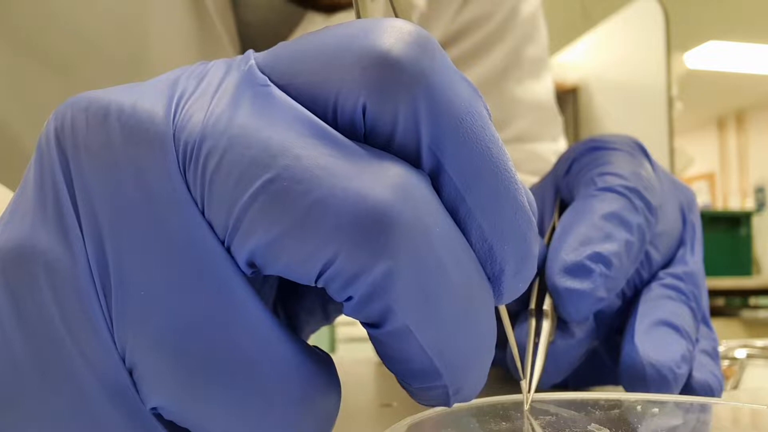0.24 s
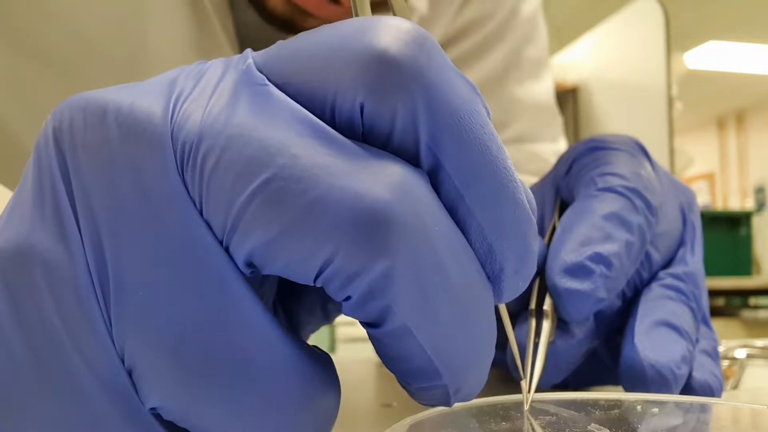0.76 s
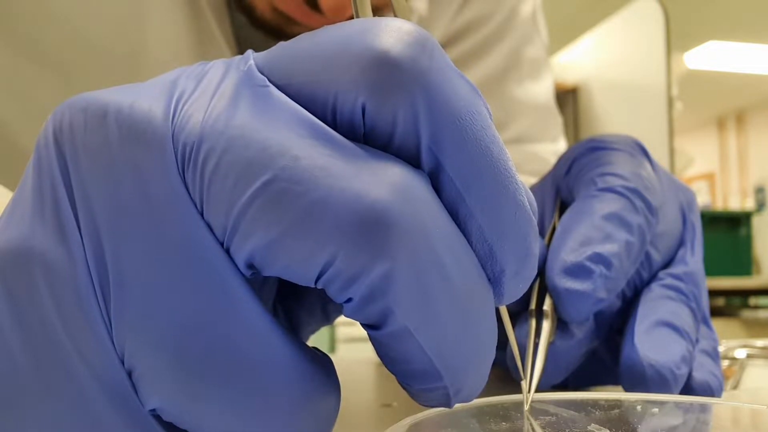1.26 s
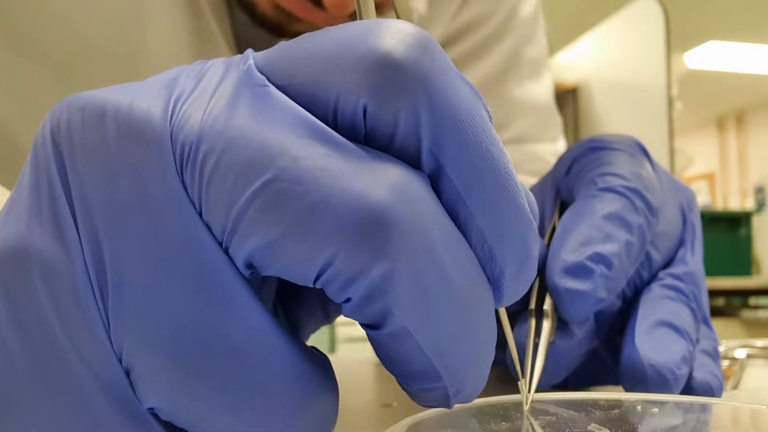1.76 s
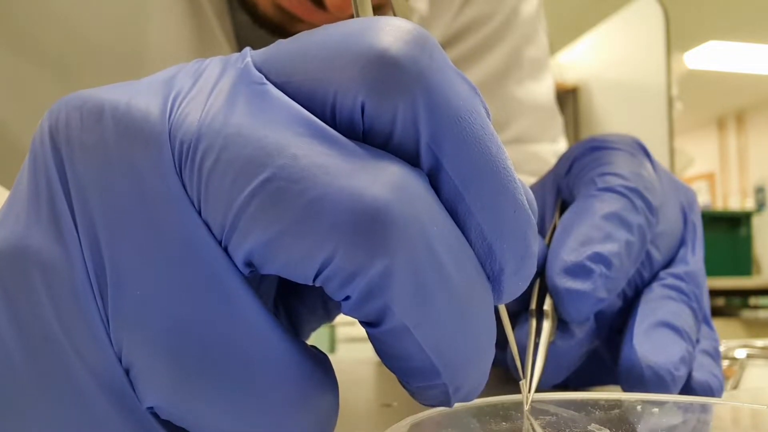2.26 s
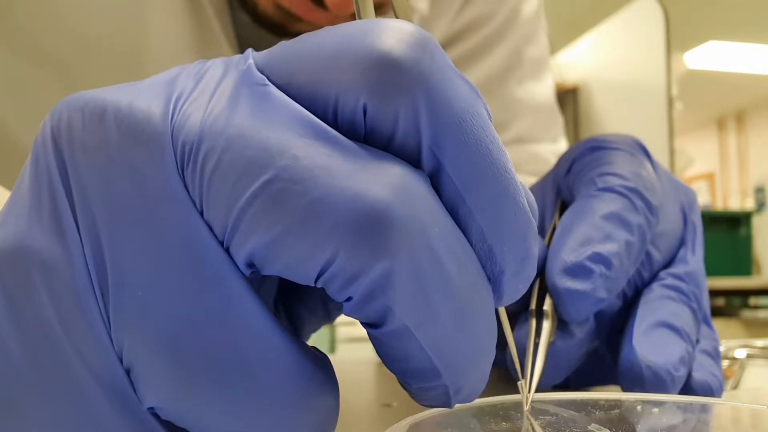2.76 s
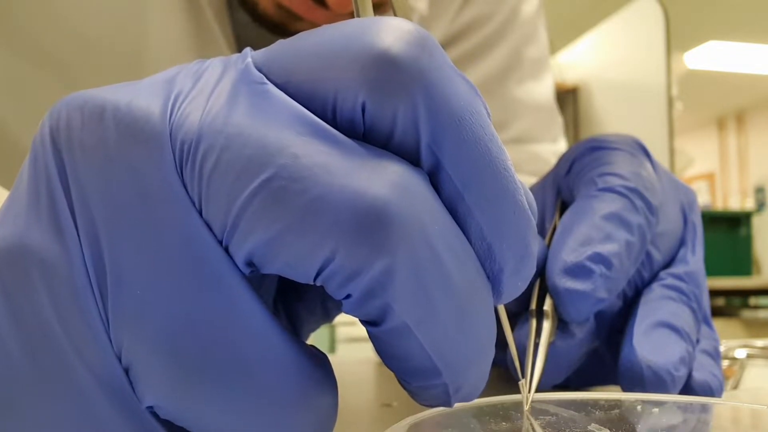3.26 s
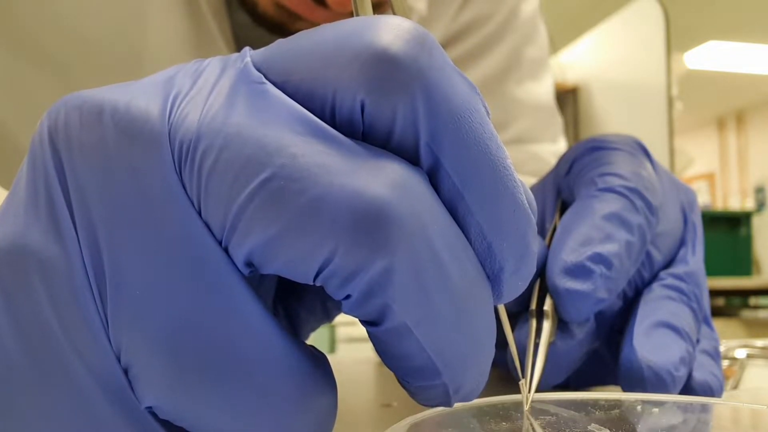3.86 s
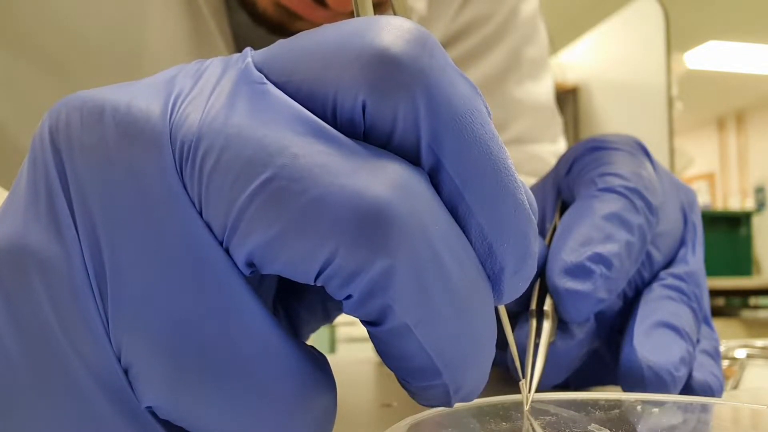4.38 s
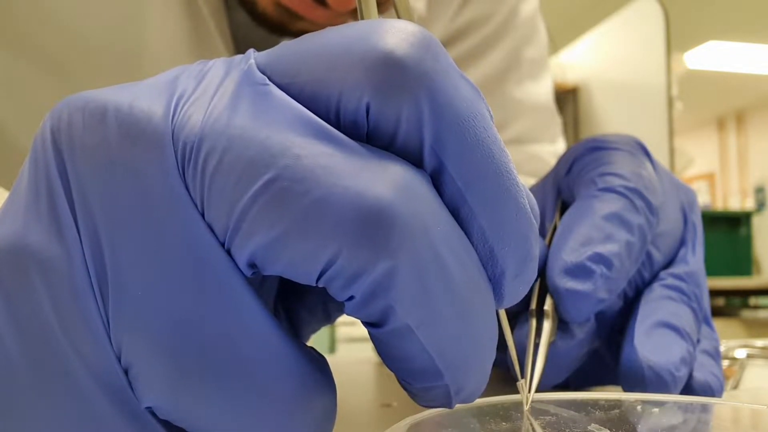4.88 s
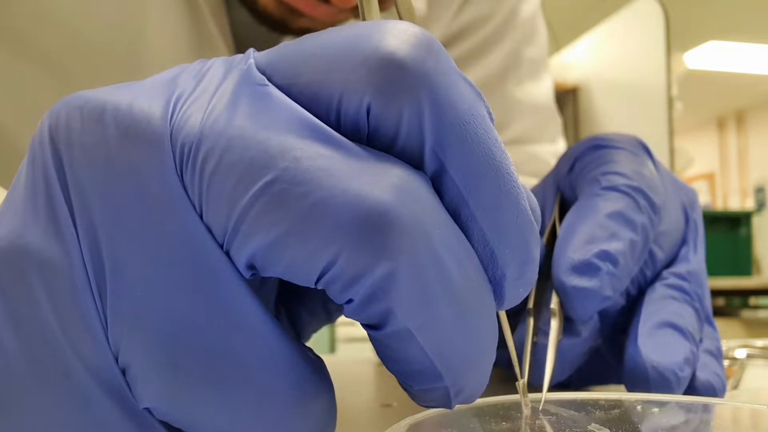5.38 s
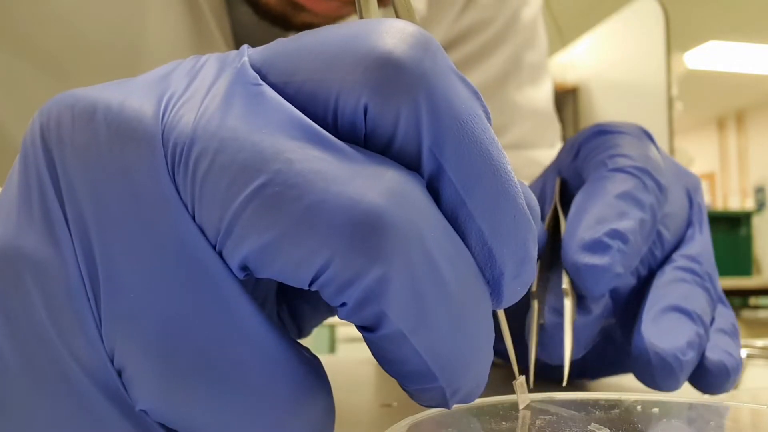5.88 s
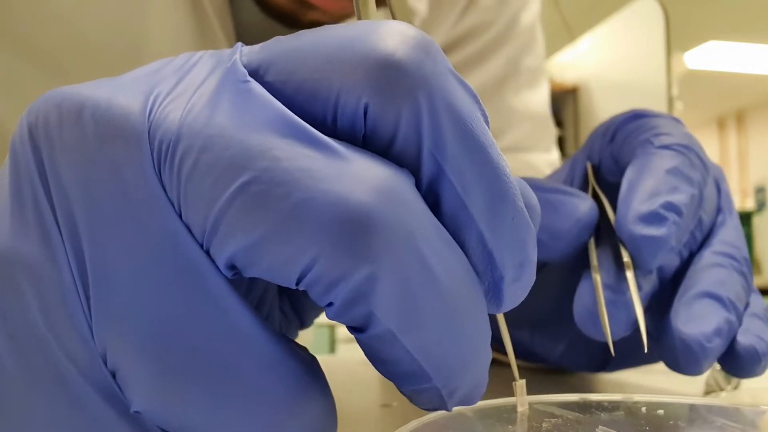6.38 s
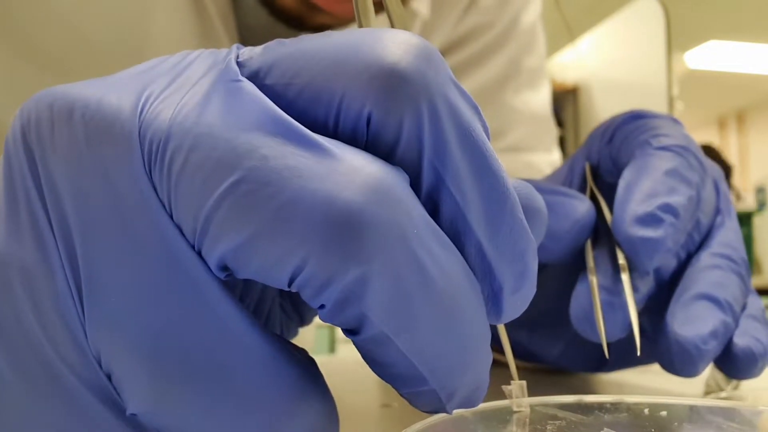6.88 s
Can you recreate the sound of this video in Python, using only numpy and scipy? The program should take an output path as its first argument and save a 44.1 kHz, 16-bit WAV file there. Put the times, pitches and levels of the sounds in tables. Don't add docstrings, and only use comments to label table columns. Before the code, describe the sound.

Fine steel tweezers scratch and tick brightly on a small glass dish over a low lab fan hum, before a soft distant cupboard thud.

```python
import sys
import numpy as np
from scipy import signal
from scipy.fft import rfft, irfft
from scipy.io import wavfile
from scipy.ndimage import uniform_filter1d

SR = 44100
rng = np.random.default_rng(int(sys.argv[2]) if len(sys.argv) > 2 else 0)


def boost_factor(decibels):
    exponent = np.asarray(decibels, float) / 20
    return 10 ** exponent


def wrap_up_sound(samples):
    columns = np.atleast_2d(samples).T
    tamed = np.clip(columns, -1, 1)
    steps = np.round(tamed * 32767).astype(np.int16)
    wavfile.write(sys.argv[1], SR, steps)


N = 314874


def evened(x):
    return x / np.sqrt(np.mean(x ** 2) + 1e-20)


def read(points, hz):
    f, value = np.transpose(points)
    return np.interp(np.log(hz + 1), np.log(f + 1), value)


def add(mix, s, sound):
    part = mix[..., round(s * SR):][..., :sound.shape[-1]]
    part += sound[..., :part.shape[-1]]


def bumps(peaks, hz):
    return 1 + sum(boost_factor(2 * db) / (1 + (2 * (hz - f) / width) ** 2) for f, width, db in peaks)


# f/Hz, likeness (1 = the same)
LIKENESS = [(25, .93), (60, 1), (130, 0.97), (290, 0.84), (640, 0.46), (1200, -0.26), (2200, -0.15),
            (3500, 0.41)]


def diffuse(gain):
    a, b, c, d = rng.standard_normal((*gain.shape[::-1], 4)).T
    size = 2 * len(gain) - 2
    same = np.clip(read(LIKENESS, np.fft.rfftfreq(size, 1 / SR)), -1, 1)[:, None]
    left = a + 1j * b
    right = same * left + np.sqrt(1 - same ** 2) * (c + 1j * d)
    return signal.istft(gain * np.array([left, right]), nperseg=size, noverlap=size * 3 // 4)[1]


# f/Hz, level/dB
AIR = [(15, -38), (28, -20), (45, -11), (64, -10), (100, -4.5), (128, -16.5), (230, -16), (450, -22.5),
       (620, -27), (1020, -32), (1700, -37.5), (2700, -42.3), (7500, -56), (15500, -49)]
# f/Hz, width/Hz, level/dB
DUCTS = [(92.2, 18.5, 6), (78, 7.7, 1.5), (142.3, 8.8, 9), (270, 1.2, -5), (312, 7.3, -3.5),
         (427, 6.3, 6.5), (545, 46, 4.5), (677.6, 20, 5), (751, 13, 2), (780, 5, -16.5), (897, 3.2, 14.5),
         (1466, 8.5, 4.5)]
# t/s, level/dB
MOTOR_BEAT = [(0, -60), (.45, -51.5), (.95, -66), (1.8, -55), (2.4, -65.5), (3.0, -61), (3.35, -72),
              (3.85, -57.5), (4.35, -65), (5.0, -58.5), (6.1, -52), (6.6, -65), (7.14, -59)]


def hum():
    hz, frames = np.fft.rfftfreq(8192, 1 / SR), N // 2048 + 5
    patches = evened(uniform_filter1d(rng.standard_normal((len(hz), frames)), size=60, axis=0))
    colour = boost_factor(read(AIR, hz)) * np.sqrt(bumps(DUCTS, hz))
    air = diffuse(colour[:, None] * boost_factor(0.32 * patches))[:, :N]
    waver = uniform_filter1d(rng.standard_normal(N), size=9000)
    waver = evened(uniform_filter1d(waver, size=9000))
    t = np.arange(N) / SR
    motor_hz = 49.2 + 0.27 * waver[::-1]
    motor = boost_factor(np.interp(t, *np.transpose(MOTOR_BEAT))) * np.sin(2 * np.pi * np.cumsum(motor_hz) / SR)
    buzz = boost_factor(-56 + 2.2 * waver) * np.sin(2 * np.pi * 100 * t)
    return (boost_factor(-48.5) * evened(air) + np.sqrt(2) * (motor + buzz)) * boost_factor([[-.45], [.45]])


def ports(x):
    late_s, weaker_db = 0.00022, 6
    return np.array([x[0], boost_factor(-weaker_db) * np.roll(x[-1], round(late_s * SR))])


FAMILY_BORDERS = [3550, 4700, 6550, 8100]
# f/Hz, level/dB per dB of peak
WAKING = [(1735, .3), (2620, .3), (3050, -.1), (3335, .4), (3720, .4), (3975, -.2), (4055, -.2), (4405, .1),
          (4500, -.05), (4878, .35), (5230, .4), (5655, -.05), (6097, .35), (6300, 0), (6650, .4),
          (7170, -.3), (7290, .2), (7348, .2), (7680, -.1), (9000, 0)]


def rasp(rows, modes, grit, grit_db, treble_db, place_db, fade_s, damp_s, bloom_s, swarm, swarm_db, swarm_s, spots):
    out = np.zeros((2, N))
    hz, width, db = np.transpose(modes)[:, :, None]
    mode_hz = hz[:, 0]
    family = np.searchsorted(FAMILY_BORDERS, mode_hz)
    t, bins = np.arange(4096) / SR, np.fft.rfftfreq(256, 1 / SR)
    window = np.hanning(256)

    dying = np.exp(-np.pi * width * t - (t / damp_s) ** 2)
    dying *= 1 - np.exp(-(t / bloom_s) ** 2)
    near = dying * np.sin(2 * np.pi * hz * t)
    far = dying * np.sin(2 * np.pi * hz * t + rng.normal(0, 1.0, hz.shape))
    pickup = abs(rfft(near)) ** 2
    waking = np.clip(read(WAKING, mode_hz), -.5, .5)

    place = rng.standard_normal((len(rows), len(modes)))
    swarms = rng.standard_normal((len(rows), 2, 1024)) * np.exp(-t[:1024] / swarm_s)
    tint = np.roll(irfft(boost_factor(read(swarm, bins))), 128) * window
    dry = np.roll(irfft(boost_factor(read(grit, bins))), 128) * window
    slips = rng.standard_normal((len(rows), 4096))
    slips *= boost_factor(6.1 * np.minimum(rng.exponential(1, (len(rows), 4096)), 3))

    for (s, peak_db, contact_s, low, middle, high), spot, slip, crowd in zip(rows, place, slips, swarms):
        rise_s = 0.6 * contact_s
        press = np.sin(np.pi / 2 * np.clip(t / rise_s, 0, 1)) ** 2
        release = np.exp(-np.maximum(t - contact_s, 0) / fade_s - 0.065 * t / contact_s)
        force = slip * press * release

        harder_db = 0.3 * (peak_db + 51.5)
        share = boost_factor(db[:, 0] + place_db * spot + waking * (peak_db + 39.0))
        share /= np.sqrt(np.bincount(family, share ** 2))[family]
        share *= boost_factor(np.array([low, middle, 0, high, treble_db + harder_db]))[family]
        for from_s, to_s, spot_hz, spot_db in spots:
            if from_s < s <= to_s:
                share *= boost_factor(spot_db * np.exp(-((mode_hz - spot_hz) / 85) ** 6))
        weight = share / np.sqrt(pickup @ abs(rfft(force)) ** 2)

        body = np.array([weight @ near, weight @ far])
        body /= np.linalg.norm(body[0])
        body[:, :256] += boost_factor(grit_db + harder_db) * dry / np.linalg.norm(dry)
        crowd = signal.fftconvolve(crowd[:1] + .5 * crowd, tint[None], "same", axes=1)
        body[:, :1024] += boost_factor(swarm_db) * crowd / np.linalg.norm(crowd[0])

        sound = signal.fftconvolve(force[None], body, axes=1)
        loudest = np.sqrt(uniform_filter1d(sound[0] ** 2, size=180).max())
        add(out, s - .5 * rise_s - .5 * bloom_s, boost_factor(peak_db - 3.5) * sound / loudest)
    return ports(out)


# t/s, peak level/dB, contact/s, low modes/dB, high modes/dB (against central ones)
TAPS = [(0.167, -52, 0.018, 4, 19), (0.184, -50.5, 0.021, 2.5, 13.5), (0.209, -55.5, 0.012, -2, 17),
        (1.463, -33.5, 0.007, -12, -7), (1.469, -30, 0.008, -9.5, -3), (1.484, -41, 0.016, 3, -4),
        (1.498, -45.5, 0.01, -11, 0), (1.511, -40.5, 0.007, -2.5, 3.5), (1.922, -50.5, 0.028, -1, 14.5),
        (1.957, -50.5, 0.0088, -5, 10), (2.826, -40.5, 0.025, -5.5, -8), (2.844, -47.5, 0.015, 16, -6),
        (2.977, -46, 0.018, 2.5, 9.5), (2.995, -48, 0.009, 2, 9), (3.394, -53, 0.021, 0, 7),
        (4.622, -43, 0.013, 2, 2.5), (4.659, -46, 0.029, -10, -4), (4.682, -47.5, 0.011, -7, 2),
        (5.013, -48.5, 0.0074, -16, 2), (5.089, -45.5, 0.038, -15, -3), (5.114, -36, 0.017, -10.5, -6),
        (5.139, -41.5, 0.026, -7.5, -7.5), (5.163, -49, 0.014, -3, 5), (5.199, -49.5, 0.005, -7, 7)]
# t/s, peak level/dB
GRAZES = [(0.065, -76), (0.125, -62), (0.25, -88), (0.33, -75), (0.82, -68.5), (1.39, -75), (1.54, -82),
          (1.69, -84), (1.858, -69), (1.89, -62.5), (2.626, -62.5), (2.793, -56), (3.077, -68),
          (3.201, -70), (3.28, -67), (3.42, -71), (4.169, -69), (4.606, -65.5), (4.88, -70), (5.374, -63.5),
          (6.128, -65.5)]
# first slip t/s, last slip t/s, first level/dB, last level/dB, high modes/dB
DRAGS = [(0.373, 0.42, -64, -87, 13), (1.746, 1.809, -63.5, -66.5, 3), (2.02, 2.03, -63, -67, 11),
         (2.111, 2.152, -64, -62.5, 1), (2.866, 2.915, -57.5, -74, -1), (3.223, 3.249, -60, -55.5, 1),
         (3.327, 3.346, -54, -62, -7), (4.71, 4.756, -57, -67.5, 1), (4.936, 4.981, -63, -54.5, -1),
         (5.022, 5.058, -50.5, -48.5, -3), (5.211, 5.233, -51, -60.5, -2)]


def dish_contacts():
    light = (0.022, -9, -2)  # contact/s, low/dB, middle/dB of a light slip or graze
    rows = []
    for s, db, contact_s, low, high in TAPS:
        rows.append((s, db, contact_s, low, 1 + 0.29 * low, high))
    for s, db in GRAZES:
        rows.append((s, db, *light, -3.5))
    for first_s, last_s, first_db, last_db, high in DRAGS:
        slips = 1 + round((last_s - first_s) / .024)
        for s, db in np.linspace((first_s, first_db), (last_s, last_db), slips):
            rows.append((s, db, *light, high))
    return rows


# f/Hz, width/Hz, level/dB within the family
DISH_MODES = [(1735, 36, -6), (2207, 36, -11), (2620, 55, -12), (3050, 45, 0), (3335, 60, -9),
              (3720, 50, -3), (3975, 40, -1), (4055, 40, -2), (4405, 45, -4), (4500, 50, -7), (4878, 40, 0),
              (4960, 40, -11), (5230, 60, -13), (5655, 40, -8), (6097, 40, 1), (6190, 40, -9),
              (6300, 45, -3), (6650, 80, -11), (7170, 45, -4), (7290, 40, -7), (7348, 40, -1),
              (7680, 45, -6), (8690, 55, -7), (9500, 70, -7), (10520, 70, 0), (11650, 90, -5),
              (12900, 800, -7), (15000, 600, -2)]
# f/Hz, level/dB
DISH_GRIT = [(500, -24.5), (1500, -18.5), (2500, -14), (4000, -15), (6000, -1.5), (8000, -19.5),
             (10500, -15.5), (12000, -2), (15400, 10.5), (16500, -17)]
# f/Hz, level/dB
DISH_SWARM = [(600, -19), (1200, -4), (2500, -5), (4000, -11), (5500, -4.5), (7000, 2), (8000, -9),
              (10000, -22), (16000, -28.5)]
# from t/s, to t/s, mode f/Hz, level/dB
DISH_SPOTS = [(0.106, 0.226, 7400, -13), (0.106, 0.226, 7680, -10.5), (0.356, 0.436, 2620, -7),
              (0.356, 0.436, 7680, -12), (1.448, 1.479, 3720, -4), (1.448, 1.479, 7170, -12),
              (1.448, 1.479, 7280, -5), (1.479, 1.531, 3050, -14), (1.479, 1.531, 4000, -8),
              (1.479, 1.531, 7230, -12), (1.479, 1.531, 7680, -11), (1.736, 1.836, 2620, 6),
              (1.736, 1.836, 6300, -10), (1.736, 1.836, 7200, -5.5), (1.906, 1.981, 7330, -15),
              (1.906, 1.981, 7680, -7), (1.996, 2.056, 2207, -5), (1.996, 2.056, 7170, -6),
              (1.996, 2.056, 7680, -11), (2.096, 2.186, 3720, 8), (2.096, 2.186, 6300, -4),
              (2.096, 2.186, 7680, -6), (2.776, 2.811, 4900, -3), (2.776, 2.811, 5230, 7),
              (2.776, 2.811, 5655, -10), (2.776, 2.811, 6100, -11), (2.776, 2.811, 7170, -14),
              (2.776, 2.811, 7680, -8), (2.811, 2.866, 3720, -7), (2.811, 2.866, 5655, 7.5),
              (2.811, 2.866, 6100, -5), (2.811, 2.866, 8690, 9), (2.866, 2.926, 6300, -7),
              (2.811, 2.866, 3050, -0.5),
              (2.966, 3.026, 6140, -5), (2.966, 3.026, 7300, -19), (2.966, 3.026, 7680, -9),
              (3.206, 3.296, 5655, -6), (3.206, 3.296, 6140, -9), (3.206, 3.296, 3990, 4),
              (3.206, 3.296, 7170, -9), (3.206, 3.296, 7680, -11), (3.206, 3.376, 4900, -6),
              (3.316, 3.376, 4400, 6), (3.316, 3.376, 6300, -7), (3.381, 3.436, 3050, -12),
              (3.381, 3.436, 4020, 8.5), (3.381, 3.436, 4450, -10), (3.381, 3.436, 4900, -8),
              (3.381, 3.436, 6300, -11), (3.381, 3.436, 7400, -12), (3.381, 3.436, 7680, -9),
              (4.611, 4.646, 2207, 6), (4.611, 4.646, 3050, -12), (4.611, 4.646, 3335, -11),
              (4.611, 4.646, 3720, 2), (4.611, 4.646, 4870, -17), (4.611, 4.648, 5655, 4),
              (4.611, 4.646, 6270, -14), (4.611, 4.646, 6650, -14), (4.611, 4.646, 7270, -10),
              (4.611, 4.646, 7330, -1), (4.611, 4.646, 7680, -12), (4.648, 4.756, 4015, -3),
              (4.648, 4.753, 4420, 1), (4.648, 4.756, 4900, -15), (4.648, 4.756, 5230, 1),
              (4.648, 4.75, 5655, -6), (4.648, 4.752, 7180, -10), (4.648, 4.758, 7680, -10),
              (4.926, 5.081, 7300, -4), (5.101, 5.133, 4500, 4), (5.101, 5.133, 6300, -6),
              (5.101, 5.133, 7300, -11), (5.133, 5.186, 2620, 7), (5.133, 5.186, 6650, -9),
              (5.133, 5.186, 7080, -11), (5.186, 5.256, 6300, -10), (5.186, 5.256, 7170, -7),
              (5.186, 5.256, 7680, -4)]
# from t/s, to t/s, mode
# f/Hz, level/dB
MORE_SPOTS = [(.106, .15, 4015, 9.5), (1.448, 1.479, 4015, 4), (2.966, 3.026, 10520, -2),
              (1.448, 1.479, 6097, 5), (1.448, 1.479, 3050, -1), (1.906, 1.94, 3050, 4.5),
              (1.906, 1.981, 4015, 2), (2.811, 2.866, 4450, 3), (2.966, 3.026, 4015, 1),
              (2.966, 3.026, 4450, -11), (2.966, 3.026, 4900, -7), (3.235, 3.296, 3050, 8.5),
              (3.381, 3.436, 5655, 6), (5.006, 5.02, 6097, 10), (5.101, 5.133, 5655, 7),
              (5.08, 5.186, 8690, -17), (5.08, 5.186, 9500, -12), (5.205, 5.256, 4015, 5),
              (6.301, 6.341, 7560, -12), (6.301, 6.341, 6830, 9), (6.342, 6.368, 4080, -6),
              (6.342, 6.446, 2530, 1.5)]


def dish():
    return rasp(dish_contacts(), DISH_MODES, DISH_GRIT, grit_db=-17.0, treble_db=-7.0, place_db=1.0,
                fade_s=.004, damp_s=.045, bloom_s=.0035, swarm=DISH_SWARM, swarm_db=-15.0, swarm_s=.009,
                spots=DISH_SPOTS + MORE_SPOTS)


# f/Hz, time to fall 60 dB/s
LAB_RING = [(80, 0.99), (300, 0.36), (1000, 0.62), (3000, 0.46), (8000, 0.34), (15000, 0.1)]


def lab_tail(gain, frames, size):
    hz, t = np.fft.rfftfreq(size, 1 / SR), np.arange(frames) * size / 4 / SR
    return diffuse(gain(hz)[:, None] * boost_factor(-60 * t / read(LAB_RING, hz)[:, None]))


def lab_echo(tools):
    echo = lab_tail(lambda hz: 1 / (1 + (hz / 6000) ** 4), frames=300, size=256)
    echo /= np.linalg.norm(echo[0])
    return boost_factor(-26.5) * signal.fftconvolve(tools[:1], echo, axes=1)[:, :N]


# t/s, f/Hz, level/dB, time to fall 60 dB/s
THUMPS = [(1.47, 840, -54.5, 0.16), (2.831, 1096, -58, 0.093), (4.625, 545, -33.5, 0.037),
          (4.664, 530, -47.5, 0.15), (5.121, 547, -51.5, 0.15), (6.39, 487, -47, 0.065),
          (6.527, 492, -43.5, 0.088), (6.635, 1620, -60, 0.071), (6.695, 96.4, -27, 0.18),
          (6.83, 817, -33, 0.04), (6.857, 270, -44, 0.27), (6.921, 368, -53, 0.099)]


def low_thumps():
    out, t = np.zeros(N), np.arange(8000) / SR
    for s, hz, db, t60 in THUMPS:
        add(out, s, boost_factor(db - 60 * t / t60) * np.clip(t / 0.01, 0, 1) * np.sin(2 * np.pi * hz * t))
    return out * boost_factor([[1.5], [-1.5]])


# t/s, peak level/dB, dying/s, brightness/(dB per kHz)
SNAPS = [
    (1.473, -61, 0.002, -1),
    (1.4855, -56, 0.002, 0.5),
    (2.847, -69, 0.0025, -0.5),
    (4.626, -67, 0.0018, -4),
    (5.0147, -60, 0.0049, -1),
    (5.046, -68.5, 0.0047, -1),
    (5.198, -57, 0.0026, -2),
    (6.354, -46.5, 0.0018, -1.5),
    (6.658, -60, 0.0012, -3),
]


def snaps():
    out, t, hz = np.zeros((2, N)), np.arange(2048) / SR, np.fft.rfftfreq(2048, 1 / SR)
    slope = [(800, -22), (2500, -21), (5000, -6.5), (15400, 14.0), (16500, -17)]  # f/Hz, level/dB
    for (s, db, dying_s, bright), crackle in zip(SNAPS, rng.standard_normal((len(SNAPS), 2, 2048))):
        crackle = crackle[:1] + .5 * crackle
        crackle = irfft(rfft(crackle) * boost_factor(read(slope, hz) + bright * (hz / 1000 - 11)))
        add(out, s, boost_factor(db + 13.0) * crackle * np.clip(t / 0.0012, 0, 1) * np.exp(-t / dying_s))
    return ports(out)


# t/s, peak level/dB, contact/s, middle modes/dB, high modes/dB (against central ones)
SCUFFS = [(6.278, -59.5, 0.025, -8, 8), (6.317, -43.5, 0.0072, -14, 23), (6.353, -40.5, 0.005, -12, 5.5),
          (6.364, -49, 0.011, -6, -2), (6.376, -53, 0.012, 11, -1), (6.394, -45.5, 0.015, 12, 12),
          (6.407, -54, 0.016, 0, 9), (6.428, -60, 0.015, 0, 6), (6.511, -53, 0.018, -3, 5),
          (6.532, -45.5, 0.022, 1, 4), (6.554, -48, 0.014, 6, 8), (6.596, -52, 0.013, -3, 10),
          (6.657, -40.5, 0.011, -13, 11), (6.912, -51, 0.0096, -7, 3), (7.118, -61, 0.024, -1, 5.5)]
# f/Hz, width/Hz, level/dB within the family
TRAY_MODES = [(1665, 55, -2), (2040, 45, -4), (2300, 120, -11), (2530, 60, -1), (3400, 160, -7),
              (3750, 200, -8), (4040, 70, -6), (4115, 40, 0), (4900, 70, -1), (5220, 110, -7),
              (5690, 150, -3), (6125, 55, -2), (6500, 90, -6), (6830, 70, 0), (7000, 60, -1),
              (7560, 120, -9), (8400, 180, 3), (9300, 300, -6), (10350, 60, -2), (11000, 130, -6)]
# f/Hz, level/dB
TRAY_GRIT = [(700, -25), (1500, -8), (3000, -25), (5000, 0), (7000, 2), (10000, 15.5), (15500, 15)]
# f/Hz, level/dB
TRAY_SWARM = [(600, -23), (1500, -5), (3000, 0), (4500, -21), (6000, 2), (7300, -5), (9000, -10),
              (16000, -21)]
# from t/s, to t/s, mode f/Hz, level/dB
TRAY_SPOTS = [(6.301, 6.341, 5220, -7), (6.301, 6.341, 7000, -11), (6.342, 6.368, 2040, -6),
              (6.342, 6.368, 6125, -13), (6.342, 6.368, 6500, -8), (6.64, 6.674, 2530, 2),
              (6.368, 6.446, 3400, 12), (6.368, 6.446, 5220, 9), (6.496, 6.586, 2040, -8),
              (6.496, 6.586, 2300, 10), (6.496, 6.586, 7000, 1), (6.496, 6.586, 5690, -6),
              (6.368, 6.446, 7000, 5.5), (6.586, 6.626, 5690, -8), (6.586, 6.626, 7000, -2),
              (6.27, 6.341, 2530, 12), (6.342, 6.368, 5690, -6), (6.641, 6.674, 1665, -10),
              (6.641, 6.674, 2040, -18), (6.641, 6.674, 3750, 13), (6.641, 6.674, 5690, 0),
              (6.641, 6.674, 6500, 14), (6.641, 6.674, 6830, -7), (6.641, 6.674, 7000, -5),
              (6.641, 6.674, 7560, -13), (6.901, 6.936, 2040, 0), (6.901, 6.936, 5690, -8),
              (6.901, 6.936, 10350, -15)]


def tray():
    low_db = 3
    scuffs = [(s, db, contact_s, low_db, middle, high) for s, db, contact_s, middle, high in SCUFFS]
    return rasp(scuffs, TRAY_MODES, TRAY_GRIT, grit_db=-18.0, treble_db=-0.5, place_db=2.0,
                fade_s=0.016, damp_s=0.038, bloom_s=.002, swarm=TRAY_SWARM, swarm_db=-10.0, swarm_s=.006,
                spots=TRAY_SPOTS + MORE_SPOTS)


# t/s, rattle level/dB, boom level/dB, boom swell/s
THUDS = [
    (6.678, -42.5, -34, 0.033),
    (6.812, -51.5, -45, 0.018),
    (6.912, -83, -53.5, 0.0076),
]
# f/Hz, level/dB
CUPBOARD_COLOUR = [(30, -39), (50, -29), (105, 5.5), (206, -21), (349, -5.5), (592, -20), (800, -14.5),
                   (1220, -9.5), (1920, -22.5), (3030, -15), (6850, -22.5), (9000, -15.5), (15500, -25.5)]
# f/Hz, width/Hz, level/dB over the colour
PANELS = [(98, 48, 3.5), (170, 41, -12), (270, 39, 16), (345, 17, -3), (430, 17, 8.5), (530, 36, 9),
          (777, 38, 15), (1810, 69, 11), (2300, 210, 6.5), (3050, 70, 8.5), (5400, 90, 4), (6600, 250, 5.5)]


def cupboard():
    out = np.zeros((2, N))
    colour = lambda hz: boost_factor(read(CUPBOARD_COLOUR, hz)) * np.sqrt(bumps(PANELS, hz))
    lows = signal.butter(3, 600, fs=SR, output="sos")
    highs = signal.butter(3, 600, "high", fs=SR, output="sos")
    for s, rattle_db, boom_db, swell_s in THUDS:
        tail = lab_tail(colour, frames=90, size=1024)
        t = np.arange(tail.shape[1]) / SR
        tail *= 1 + np.exp(-(t / 0.067) ** 2)
        boom, rattle = signal.sosfilt(lows, tail), signal.sosfilt(highs, tail)
        for part, db, rise_s in ((boom, boom_db, swell_s), (rattle, rattle_db, .008)):
            level = np.sqrt(np.mean(part[:, :2200] ** 2))
            add(out, s, boost_factor(db) * part / level * np.clip(t / rise_s, 0, 1))
    return out


def scene():
    tools = dish() + tray() + snaps()
    return tools + lab_echo(tools) + low_thumps() + cupboard() + hum()


# f/Hz, level/dB
MIC_TONE = [(20, -0.5), (7700, 0.5), (8150, -21), (9300, -21), (10200, -16), (11500, -16), (15500, -15)]


def microphone(dry):
    hz = np.linspace(0, SR / 2, 513)
    tone = signal.firwin2(401, hz, boost_factor(read(MIC_TONE, hz)), fs=SR)
    return signal.oaconvolve(dry, tone[None], "same")


def roll_off(x):
    return signal.sosfilt(signal.butter(12, 15680, fs=SR, output="sos"), x)


def record(dry):
    heard = microphone(dry)
    return roll_off(heard)


dry = scene()
out = record(dry)
wrap_up_sound(out)
```